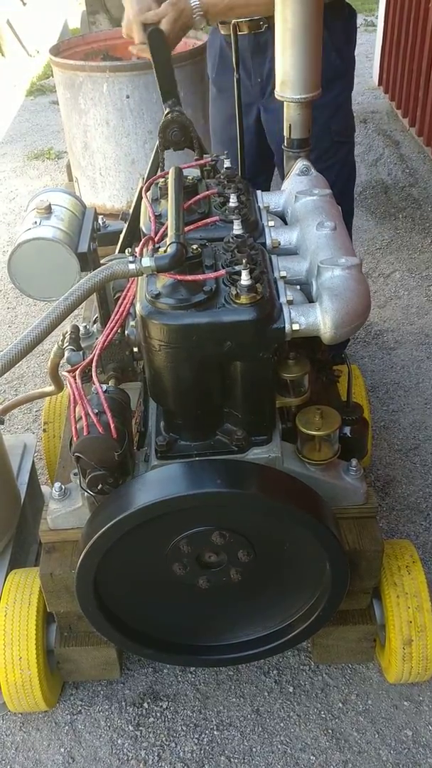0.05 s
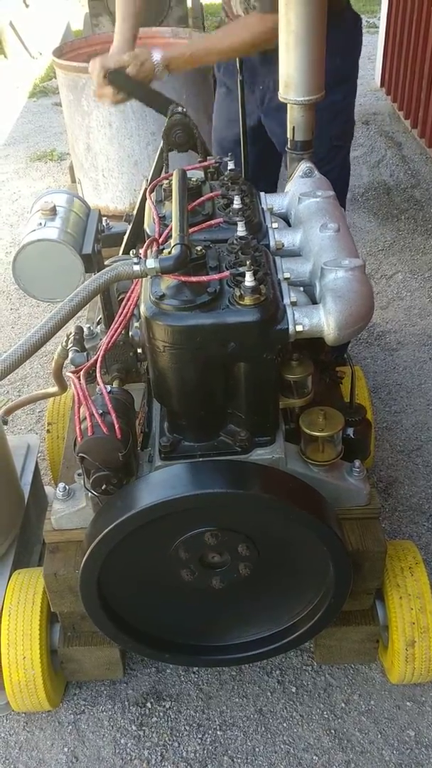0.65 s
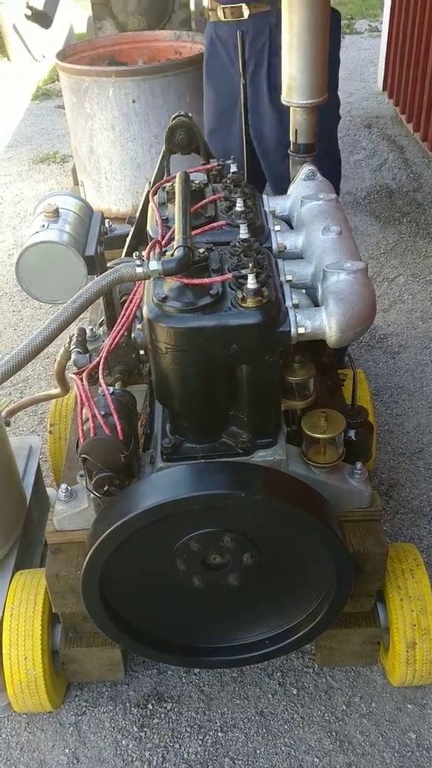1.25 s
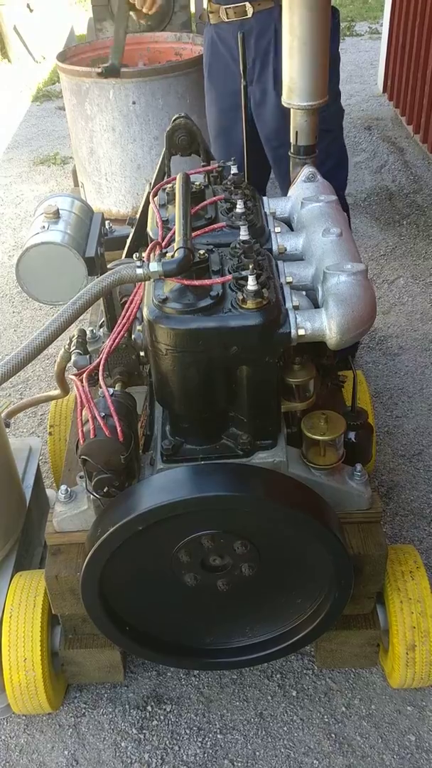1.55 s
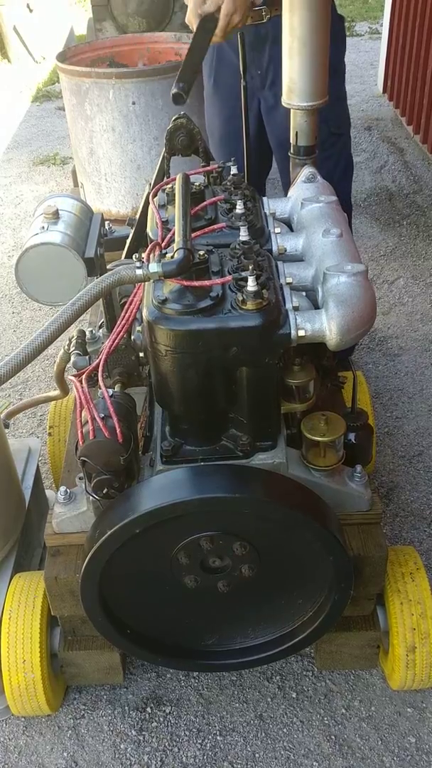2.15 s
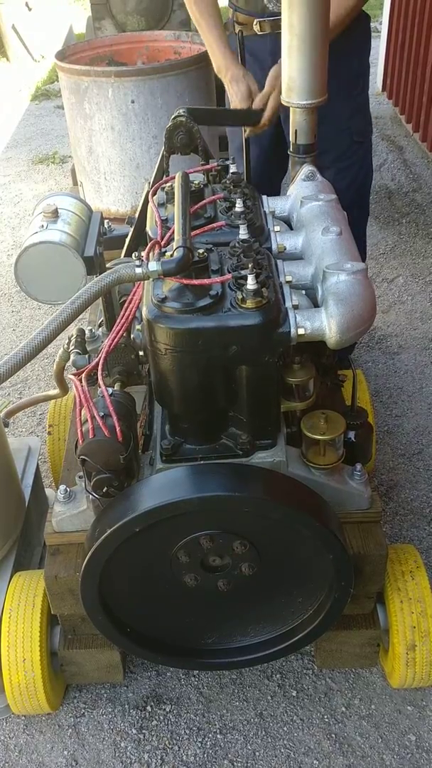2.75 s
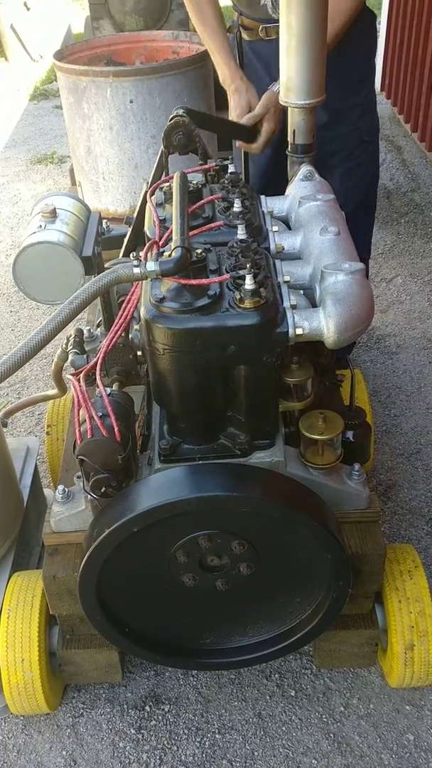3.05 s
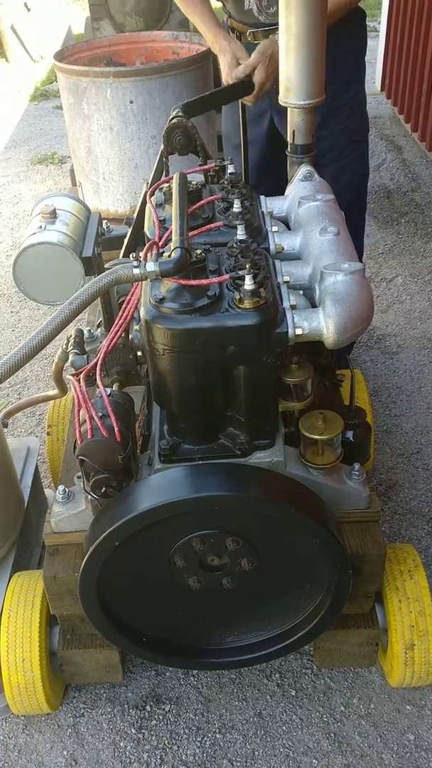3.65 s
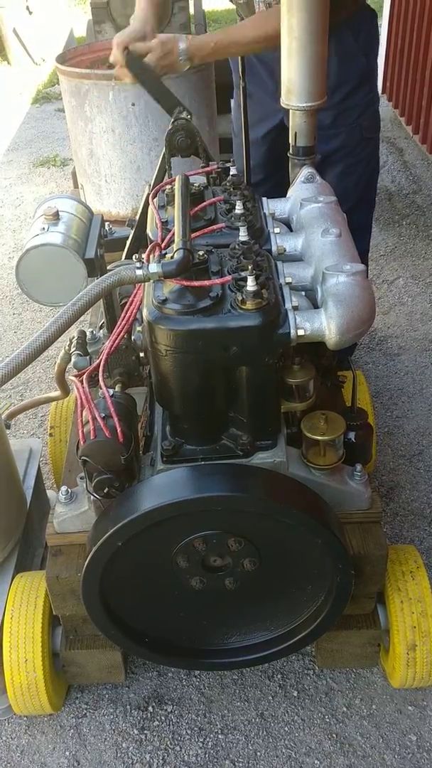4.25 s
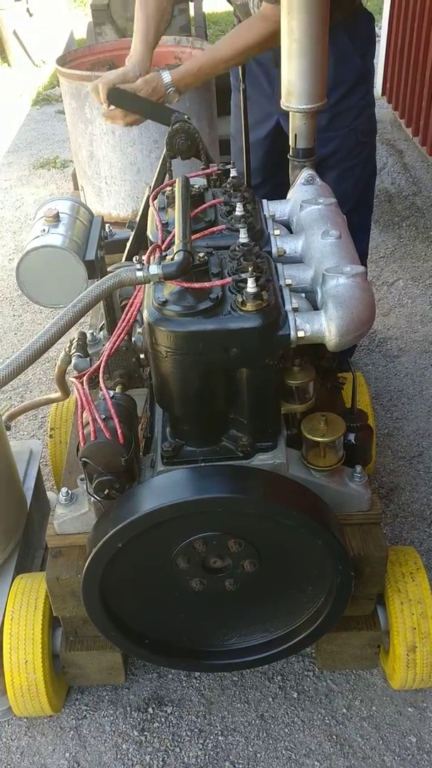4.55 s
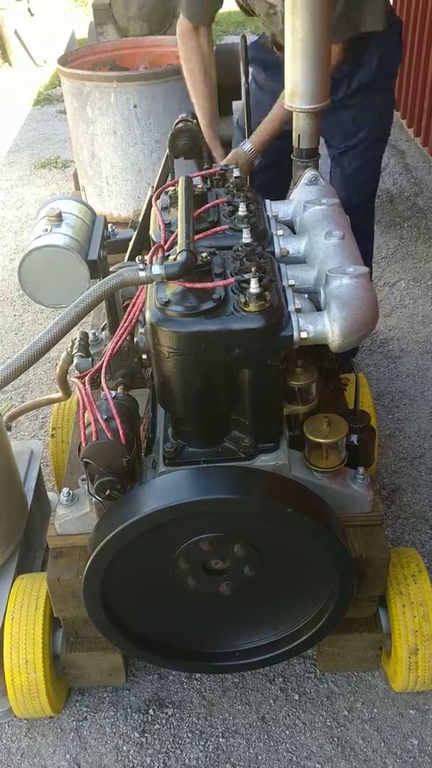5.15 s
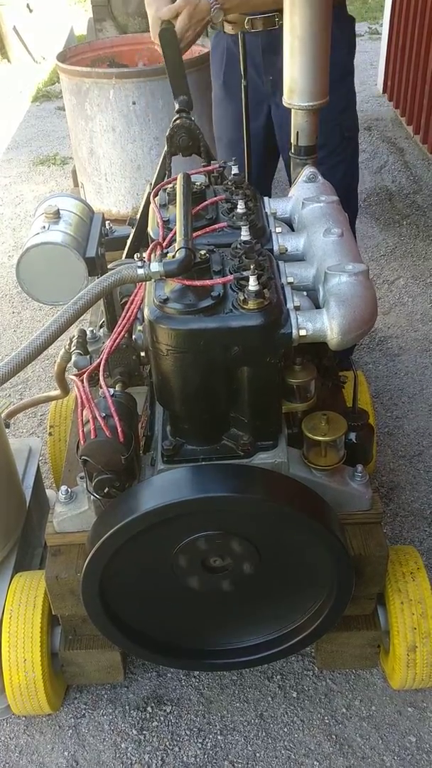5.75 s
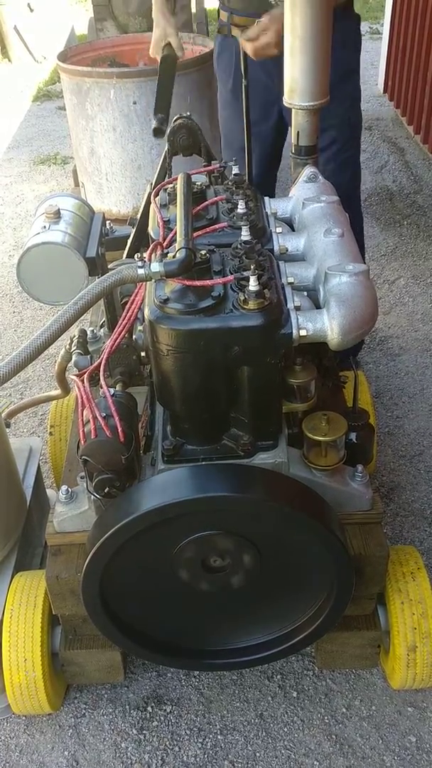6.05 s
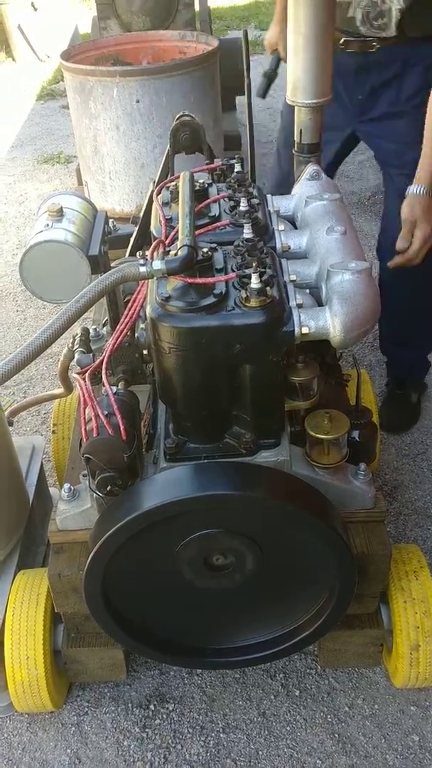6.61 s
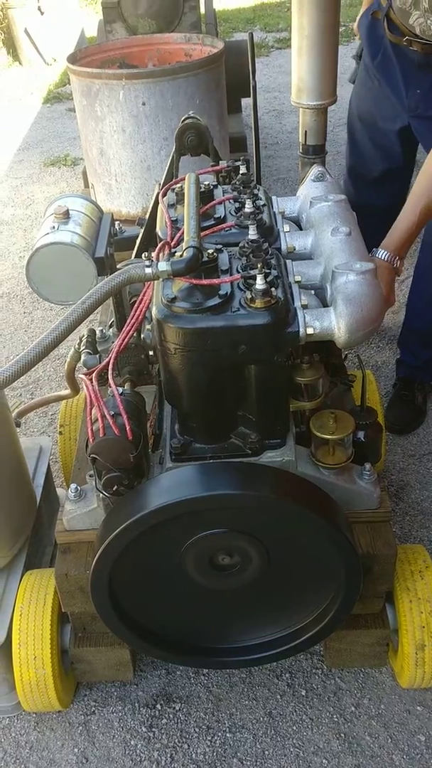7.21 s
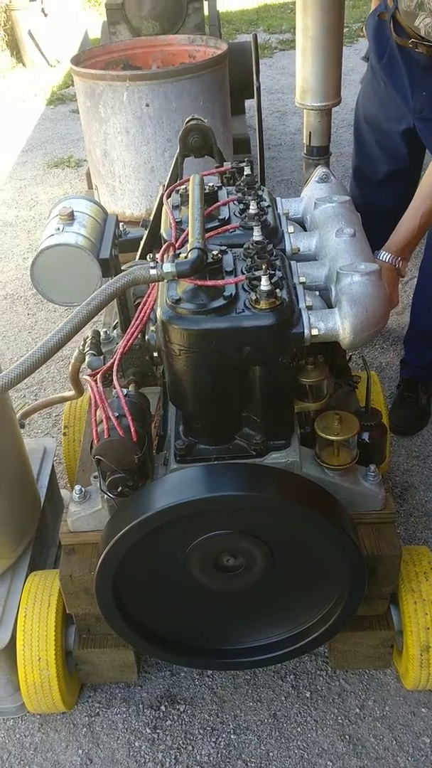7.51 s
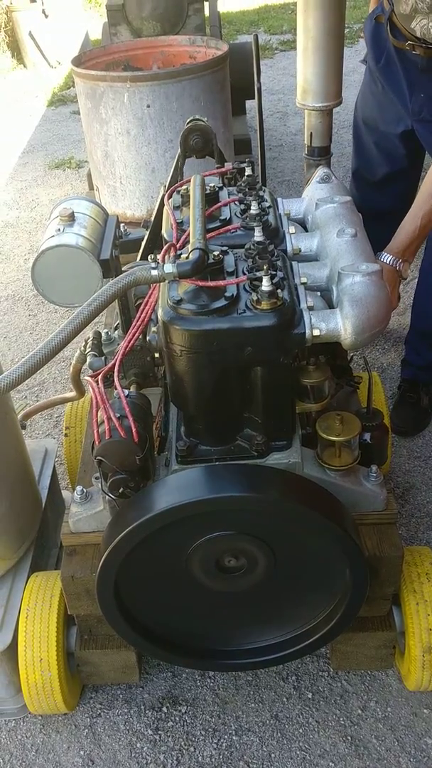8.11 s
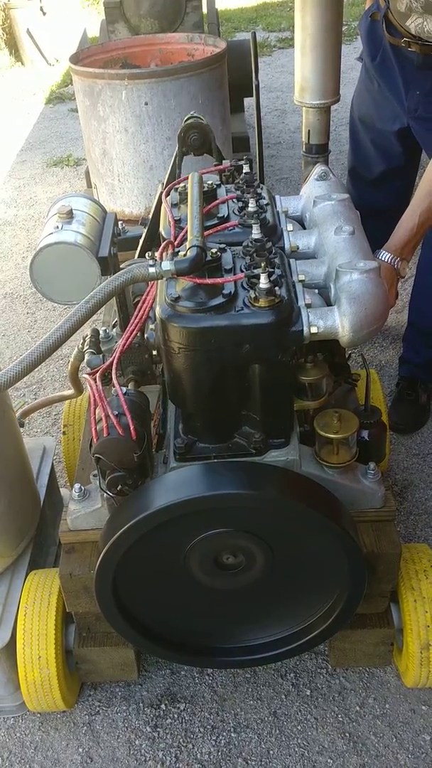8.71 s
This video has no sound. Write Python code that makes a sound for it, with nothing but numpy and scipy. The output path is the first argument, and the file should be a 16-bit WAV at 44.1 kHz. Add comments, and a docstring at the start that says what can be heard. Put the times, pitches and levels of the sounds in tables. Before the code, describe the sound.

Soft outdoor air is heard throughout, with light wind buffeting the microphone mostly in the first two seconds. From about 0.7 to 1.4 seconds, the starting crank of an old four-cylinder engine clacks loudly in its chain drive, with short steel pings and a faint hiss of air, followed by two faint chain scrapes. Scattered clicks and knocks continue from 2.4 to 5.1 seconds, with one sharp, ringing clank near 2.9 and a cluster of softer knocks between 4.1 and 4.5. At about 5.5 seconds, a second swing sets off several separate firings that spit and boom in the silencer. The engine catches around 5.9, sags briefly near 6.4, then gathers speed with an intake roar and a thin, rattling whistle. From about 7.5 seconds the roar eases into a loud, fast idle, clattering, hissing and throbbing until the end, near 9 seconds.

```python
"""An old four-cylinder boat engine is started by hand in an open yard, with wind on the microphone.
The starting crank clacks in its chain drive and is swung twice, drawing in air; loose steel rings on.
On the second swing a few slow firings burst out and boom in the silencer. The engine catches, roars
through its intake while it gathers speed, and settles into a fast, hissing idle. Its clatter, hiss,
roar, whistle and exhaust throb all beat with the firings."""
import sys
import numpy as np
from scipy import signal
from scipy.fft import rfft, irfft, next_fast_len
from scipy.io import wavfile

SR = 44100
rng = np.random.default_rng(int(sys.argv[2]) if len(sys.argv) > 2 else 0)


def int16_out(signal):
    """Quantize to a 16-bit WAV file."""
    q = np.round(np.clip(np.atleast_2d(signal).T, -1, 1) * 32767)
    wavfile.write(sys.argv[1], SR, q.astype(np.int16))


N = 386757
T = np.arange(N) / SR
CATCH_S = 5.87  # the engine runs by itself from here

# The engine sags, picks up and levels off. Each row: time in seconds, firings per second.
SPEED = [(6.0, 19.6), (6.38, 17.2), (6.6, 21.3), (6.75, 24.8), (7.0, 29.7), (7.3, 33.7), (8.03, 36.6),
         (8.44, 34.8), (8.77, 32.7)]
# Resonances of the intake. Each row: pitch in Hz, width in Hz, level in dB.
INTAKE_MODES = [(234, 130, -9), (394, 160, -6), (511.7, 40, -8), (683, 300, -1.5), (725, 68, -8.5),
                (907, 88, -3)]
# Tone of the air hiss. Each row: frequency in Hz, level in dB.
HISS_COLOUR = [(1500, -1.5), (3300, 7.5), (4200, 9.5), (5100, 6), (6200, 10), (8400, -1), (11000, 2.5),
               (13500, -1), (16000, 5.5)]
# Boom of the silencer. Each row: frequency in Hz, level in dB.
SILENCER_COLOUR = [(12, -52), (36, 0.5), (52, 4), (76, 2.5), (105, 2), (145, -8), (300, -26), (900, -55)]


def gain_of(db):
    """Decibels to amplitude."""
    return 10 ** (np.asarray(db) / 20)


def unit_rms(x):
    """Scales to an rms of 1."""
    return x / np.sqrt(np.mean(x ** 2) + 1e-20)


def spectrum_at(points, hz):
    """Reads a spectrum on a log-frequency axis."""
    f, value = np.transpose(points)
    return np.interp(np.log(hz + 1), np.log(f + 1), value)


def automation(points):
    """Draws a line through timed points, at every sample."""
    return np.interp(T, *np.transpose(points))


def add(mix, start_s, sound):
    """Mixes a stereo sound in."""
    part = mix[:, round(start_s * SR):][:, :sound.shape[1]]
    part += sound[:, :part.shape[1]]


def coloured(x, points, size=8192):
    """Minimum-phase EQ, so that nothing sounds ahead of an attack."""
    log_gain = np.log(gain_of(spectrum_at(points, abs(np.fft.fftfreq(size, 1 / SR)))))
    taps = np.fft.ifft(np.exp(np.conj(signal.hilbert(log_gain)))).real[:size // 2]
    return signal.oaconvolve(x, taps[None], axes=1)[:, :x.shape[1]]


def noise(size=N):
    """Stereo white noise: alike in the bass, wide in the treble."""
    # Likeness of the two microphone ports. Each row: frequency in Hz, correlation from 0 to 1.
    likeness = [(110, .88), (300, .72), (700, .42), (2400, 0)]
    full = next_fast_len(size)
    left, unrelated = rfft(rng.standard_normal((2, full)))
    same = spectrum_at(likeness, np.fft.rfftfreq(full, 1 / SR))
    right = same * left + np.sqrt(1 - same ** 2) * unrelated
    return irfft(np.array([left, right]), full)[:, :size]


def waver(per_s, size=N):
    """Random drift of rms 1 that glides to a new value per_s times a second."""
    samples = np.arange(size)
    return unit_rms(np.interp(samples * per_s / SR, samples, rng.standard_normal(size)))


def resonances(x, modes):
    """Rings x through a set of steep resonances; the sum has an rms of 1."""
    out = 0
    for hz, width, db in modes:
        b, a = signal.iirpeak(hz, hz / (0.63 * width), fs=SR)
        out = out + gain_of(db) * unit_rms(signal.lfilter(b, a, signal.lfilter(b, a, x)))
    return unit_rms(out)


def tinny_echoes(x, share, within_s, drift_per_s=7, count=8):
    """Short, randomly wavering echoes give the hiss and knocks a shifting, tinny grain."""
    out, size = x.copy(), x.shape[1]
    for port, source in zip(out, x):
        for delay in (within_s * rng.uniform(.06, 1, count) * SR).astype(int):
            port[delay:] += share / np.sqrt(count) * waver(drift_per_s, size - delay) * source[:-delay]
    return out / np.sqrt(1 + share ** 2)


def yard(wash_db=-47, hum_hz=70, hum_db=-48):
    """A soft outdoor wash with a distant, wavering hum."""
    # Tone of the open air. Each row: frequency in Hz, level in dB.
    yard_colour = [(100, -29), (180, -2), (300, -4.5), (430, -13), (950, -6), (2400, -19), (5200, -26.5),
                   (8500, -37), (15500, -35.5)]
    wash = gain_of(wash_db + .5 * waver(3.06)) * unit_rms(coloured(noise(), yard_colour))
    return wash + gain_of(hum_db) * resonances(noise(), [(hum_hz, 7, 0)])


def wind(breeze_db=-44, fade_db_per_s=1.15, lumps_db=2, flutter_db=-3, right_bias_db=13.5):
    """A fading breeze and buffets rumble on the microphone; the harder they blow, the brighter."""
    # Single buffets. Each row: peak time in seconds, length in seconds, level in dB.
    buffets = [(0.176, 0.026, -33), (0.838, 0.18, -38), (1.165, 0.18, -33.5), (1.453, 0.12, -29.5),
               (1.783, 0.082, -32), (1.979, 0.11, -27.5), (3.087, 0.2, -36), (3.654, 0.23, -39.5),
               (4.615, 0.13, -40.5)]
    breeze = gain_of(breeze_db - fade_db_per_s * T)
    buffet_power = sum(gain_of(db) ** 2 * np.exp(-(2 * (T - s) / span) ** 2) for s, span, db in buffets)
    force = np.sqrt(breeze ** 2 + buffet_power)
    # Tone of the rumble. Each row: frequency in Hz, level in dB.
    wind_colour = [(30, -31), (50, 6), (95, 0.5), (150, -8), (260, -29), (2000, -61.5)]
    rumble = unit_rms(gain_of(lumps_db * waver(30)) * coloured(noise(), wind_colour))
    flutter = unit_rms(coloured(coloured(noise(), wind_colour), [(70, -13.5), (140, -6)]))
    sharpness = gain_of(flutter_db) * 2 * force / force.max()
    pan = gain_of([[-right_bias_db / 2], [right_bias_db / 2]])  # the right port is struck harder
    return pan * force * (rumble + sharpness * flutter) / np.hypot(1, sharpness)


def swing_air(rough_db=2):
    """Air hisses in as the flywheel gathers speed on each swing, and fades as it slows."""
    # Swings of the crank. Each row: fastest moment in seconds, length in seconds, level in dB.
    swings = [(1.13, 0.74, -46), (5.587, 0.43, -39.5)]
    swell = sum(gain_of(db) * np.exp(-(2 * (T - s) / length) ** 2) for s, length, db in swings)
    return swell * unit_rms(coloured(noise() * gain_of(rough_db * waver(60)), HISS_COLOUR))


def chain_scrapes(rise_s=0.0073, t60=0.5, rough_db=3):
    """The slack chain rubs unevenly as it runs on after the first swing, and its ring fades."""
    # Rubs of the chain. Each row: start in seconds, length in seconds, level in dB.
    scrapes = [(1.421, 0.083, -41.5), (1.774, 0.067, -44.5)]
    # Ring of the chain. The row: pitch in Hz, width in Hz, level in dB.
    chain_ring = [(2310, 800, 0)]
    out, t = np.zeros((2, N)), T[:SR]
    for start, length, db in scrapes:
        rub = resonances(noise(len(t)) * gain_of(rough_db * waver(79, len(t))), chain_ring)
        envelope = np.minimum(t / rise_s, 1) * gain_of(db - 60 * np.maximum(t - length, 0) / t60)
        add(out, start, rub * envelope)
    return out


def steel_pings(width_hz=220, rise_s=.002):
    """Loose steel parts ring on after the hardest knocks, each in a narrow, beating band."""
    # Ringing parts. Each row: start in seconds, pitch in Hz, level in dB, t60 in seconds.
    pings = [(1.105, 2690, -20, 0.2), (1.107, 5640, -22.5, 0.24), (1.12, 5100, -29, 0.35),
             (1.198, 4080, -27, 0.17), (2.872, 2650, -9, 0.097), (2.873, 2906, -27, 0.3)]
    out, t = np.zeros((2, N)), T[:SR]
    for start, hz, db, t60 in pings:
        ring = resonances(noise(len(t)), [(hz, width_hz, 0)])
        add(out, start, ring * gain_of(db - 60 * t / t60) * np.minimum(t / rise_s, 1))
    return out


def frame_ring(t, spread_db=2.5, detune=.04):
    """The steel crank and iron frame ring; each blow lands elsewhere and favours other modes."""
    # Modes of crank and frame. Each row: pitch in Hz, level in dB, t60 in seconds.
    modes = [(635, -7, .07), (1380, -9, .05), (1790, -5, .05), (2650, -3, .05), (4220, -9, .05)]
    ring = 0
    for hz, db, t60 in modes:
        envelope = gain_of(db + spread_db * rng.standard_normal() - 60 * t / t60)
        pitch = hz * (1 + detune * rng.uniform(-1, 1))
        ring = ring + envelope * np.sin(2 * np.pi * pitch * t)
    return ring


def blow(row, colour, t60, echo_db, echo_t60, chatter_db, ring_db):
    """A blow cracks, chatters ever more weakly and dies, with ringing steel and a faint yard echo."""
    _, hold_s, db, body_db, bright_db = row
    sag_db_per_s, crack_tilt_db, crack_share = 101, 5.5, .3
    t = T[:SR // 3]
    after = np.maximum(t - hold_s, 0)
    during = t < hold_s + .004
    sag_db = sag_db_per_s * (t - after)
    envelope = gain_of(-sag_db - 60 * after / t60 + chatter_db * waver(515, len(t)))
    drive = tinny_echoes(noise(len(t)) * envelope, share=.9, within_s=.005)
    steel = signal.fftconvolve(drive, frame_ring(t)[None], axes=1)[:, :len(t)]
    echo = gain_of(echo_db - 60 * after / echo_t60) * noise(len(t))
    hit = unit_rms(coloured(drive + echo, colour)) + gain_of(ring_db) * unit_rms(steel)
    # the first contact is bright; the body of the frame answers after crack_share of the blow
    crack, body = (coloured(hit, [(750, body_db - tilt), (1600, -tilt), (3200, 0),
                                  (8000, bright_db + tilt)]) for tilt in (crack_tilt_db, 0))
    crack_s = crack_share * during.sum() / SR
    crossfade = np.exp(-(t / crack_s) ** 2)
    sound = crossfade * crack + (1 - crossfade) * body
    return gain_of(db) * sound / np.sqrt(np.mean(sound[:, during] ** 2))


def crank():
    """The handle, chain and pawl knock as the engine is turned over."""
    # Knocks. Each row: start in seconds, chatter length in seconds, then level, body, brightness in dB.
    clacks = [(0.721, 0.0043, -37.5, 12, -3), (0.968, 0.0094, -33, 7, 11), (1.006, 0.0034, -23, -13, 5),
              (1.026, 0.029, -13, 5.5, 4.5), (1.072, 0.04, -23.5, 0, 0), (1.1, 0.02, -13, 0, -5),
              (1.187, 0.049, -28, 7.5, 6), (1.264, 0.022, -21.5, 12.5, -28),
              (1.385, 0.029, -26.5, 6.5, 1.5), (2.387, 0.011, -37.5, -9, -3), (2.449, 0.0029, -30, -2, -16),
              (2.787, 0.0074, -41, 3, -4), (2.858, 0.0095, -28.5, -3, -7), (2.869, 0.027, -15.5, -6, -1),
              (3.109, 0.037, -28, 9.5, -11.5), (3.165, 0.0065, -34, 10, -20),
              (3.722, 0.012, -23.5, 1.5, -8), (3.942, 0.015, -35.5, 5, -7.5), (4.11, 0.039, -38, 1, -5),
              (4.286, 0.025, -36.5, -5, -5), (4.337, 0.058, -35.5, 8, -5.5), (4.441, 0.022, -34.5, 6.5, -5),
              (4.501, 0.025, -26.5, 14, 1), (5.103, 0.0041, -43, -11, 5), (5.449, .012, -21, -1, 3.5),
              (5.687, 0.0026, -29.5, 14, 23), (5.714, 0.0048, -25, -9, 3)]
    # Tone of a knock. Each row: frequency in Hz, level in dB.
    clack_colour = [(80, -32.5), (220, 2.5), (430, -12.5), (660, 1), (1100, 3), (1700, 9), (2800, 2),
                    (3500, -2.5), (5600, -4.5), (7500, -14), (16000, -18.5)]
    out = np.zeros((2, N))
    for row in clacks:
        knock = blow(row, clack_colour, t60=.07, echo_db=-21, echo_t60=.35, chatter_db=4, ring_db=-6)
        add(out, row[0], knock)
    return out


def first_firings(boom_db=-18, boom_t60=0.66, intake_db=-11, intake_t60=0.34):
    """Single cylinders fire and spit; each booms in the silencer and rings in the intake."""
    # Firings. Each row: start in seconds, blast length in seconds, then level, body, brightness in dB.
    firings = [(5.469, 0.029, -14, 0.5, 1), (5.6, 0.035, -20.5, -2, 3.5), (5.736, 0.025, -13.5, -1, 2.5),
               (5.837, 0.05, -17, -1.5, 6.5), (5.93, 0.029, -14, -2, -0.5), (5.99, 0.033, -18.5, -6, 7.5),
               (6.153, 0.023, -19, -10, 18)]
    # Tone of a blast. Each row: frequency in Hz, level in dB.
    blast_colour = [(150, 0), (430, -1), (750, 5.5), (2600, 4.5), (3500, -2), (5200, -3), (8200, -16.5),
                    (11000, -14.5), (16000, -16)]
    out, t = np.zeros((2, N)), T[:SR // 2]
    for row in firings:
        start, _, db, _, _ = row
        blast = blow(row, blast_colour, t60=.095, echo_db=-13.5, echo_t60=.88, chatter_db=1, ring_db=-20)
        boom = unit_rms(coloured(noise(len(t)), SILENCER_COLOUR))
        ring = resonances(noise(len(t)), INTAKE_MODES[-2:])
        add(out, start, blast)
        add(out, start, gain_of(db + boom_db - 60 * t / boom_t60) * boom)
        add(out, start, gain_of(db + intake_db - 60 * t / intake_t60) * ring)
    return out


def fader(full_db, per_effort=0, per_draw=0, db_per_doubling=0):
    """Gain of one engine layer: full_db, shifted as effort, draw and speed fall below their peaks."""
    # Firing strength, which falters once early on. Each row: time in seconds, level in dB.
    effort_points = [(6.0, -2), (6.37, -5.5), (6.58, 0.5), (6.75, -2.5), (7.6, 0), (8.77, -2.5)]
    # Air through the throttle, open at first, then eased back. Each row: time in seconds, level in dB.
    draw_points = [(6.0, -6.5), (6.3, -3.5), (6.43, -6.5), (6.78, -0.5), (7.05, -1.5), (7.55, -7.5),
                   (8.77, -14)]
    effort, draw, speed = automation(effort_points), automation(draw_points), automation(SPEED)
    load_db = per_effort * (effort - effort.max()) + per_draw * (draw - draw.max())
    return gain_of(full_db + load_db + db_per_doubling * np.log2(speed / speed.max()))


def throb(strokes, depth_db, peak_at):
    """A swell once per firing, highest at the share peak_at of the stroke."""
    return gain_of(depth_db * np.cos(2 * np.pi * (strokes - peak_at)))


def valve_clatter(speed, ticks_per_firing=14, tick_s=.003, tick_db=-3):
    """Envelope of valve gear and chain: short ticks over a steady churn, thicker with speed."""
    onsets = rng.random(N) < ticks_per_firing * speed / SR
    ticks = unit_rms(signal.lfilter([1], [1, -np.exp(-1 / (tick_s * SR))], onsets.astype(float)))
    clatter = np.hypot(1, gain_of(tick_db) * ticks) * (T >= CATCH_S)
    return clatter / np.sqrt(np.mean(clatter[T >= CATCH_S] ** 2))


def machinery(strokes, slowness, clatter):
    """The moving parts churn in a broad, ticking noise."""
    # Tone of the machinery. Each row: frequency in Hz, level in dB.
    machine_colour = [(60, -5.5), (150, -1), (250, -2.5), (450, -6.5), (800, 0.5), (2100, 3.5),
                      (2800, -0.5), (3400, -6), (6300, -15.5), (8200, -19), (16000, -69)]
    churn = clatter * unit_rms(coloured(noise(), machine_colour))
    level = fader(-17, per_effort=0.1, per_draw=0.08, db_per_doubling=-0.5)
    return level * throb(strokes, 0.56 * slowness, peak_at=0.065) * churn


def engine_hiss(strokes, slowness, clatter):
    """A bright hiss with a shifting, tinny grain pulses with the firings and the clatter."""
    hiss = unit_rms(coloured(tinny_echoes(noise(), share=.7, within_s=.011), HISS_COLOUR))
    level = fader(-17.5, per_effort=1, db_per_doubling=-0.5)
    return level * throb(strokes, 0.67 * slowness, peak_at=0.1) * clatter * hiss


def intake_roar(strokes, slowness):
    """Air drawn in between the firings roars in the resonances of the intake."""
    level = fader(-17, per_draw=1, db_per_doubling=-1.5)
    return level * throb(strokes, slowness, peak_at=0.68) * resonances(noise(), INTAKE_MODES)


def throttle_whistle(strokes, slowness, rattle_db=2):
    """Air whistles and rattles through the narrow throttle gap."""
    # Resonances of the gap. Each row: pitch in Hz, width in Hz, level in dB.
    gap_modes = [(2470, 110, 0), (4700, 430, -5), (6640, 420, -12)]
    rattle = unit_rms(gain_of(rattle_db * waver(150)))
    level = fader(-23, per_effort=-0.5, per_draw=1, db_per_doubling=-4)
    return level * throb(strokes, 1.7 * slowness, peak_at=0.39) * rattle * resonances(noise(), gap_modes)


def exhaust(strokes, slowness, opens_at=0.17, wobble=0.017, turbulence_db=-12, uneven_db=1.7):
    """One pressure pulse per firing booms in the silencer; slow running blurs it with turbulence."""
    openings = np.floor(strokes - opens_at + wobble * waver(30))
    pulses = -np.diff(openings, prepend=openings[0]) * gain_of(uneven_db * rng.standard_normal(N))
    sounding = T >= SPEED[0][0]
    boom = unit_rms(coloured(pulses[None], SILENCER_COLOUR) * sounding)
    boom *= np.sqrt(np.mean(sounding))  # rms 1 while it sounds
    turbulence = unit_rms(coloured(noise(), SILENCER_COLOUR))
    blur = gain_of(turbulence_db) * slowness ** 2
    level = fader(-22.3, per_effort=0.8, db_per_doubling=1)
    return level * (boom + blur * turbulence) / np.hypot(1, blur)


def engine(swell_s=0.22):
    """The engine catches and swells in, all its layers locked to the firings."""
    speed = automation(SPEED)
    strokes = np.cumsum(speed * (T >= CATCH_S)) / SR  # counts one per firing
    slowness = speed.max() / speed  # slow strokes stand further apart, so they throb more deeply
    clatter = valve_clatter(speed)
    out = machinery(strokes, slowness, clatter) + engine_hiss(strokes, slowness, clatter)
    out += intake_roar(strokes, slowness) + throttle_whistle(strokes, slowness)
    out += exhaust(strokes, slowness)
    return np.clip((T - CATCH_S) / swell_s, 0, 1) * out


def scene():
    """All sources together; the right port hears less of the top treble."""
    # Balance of the microphone ports. Each row: frequency in Hz, left over right in dB.
    port_balance = [(100, 3), (450, -2), (740, 3), (1200, 3), (3300, 2.5), (7200, 0.5), (9200, 15),
                    (12500, 17.5), (15500, 7)]
    cranking = crank() + steel_pings() + chain_scrapes() + swing_air()
    mix = cranking + first_firings() + engine() + yard() + wind()
    size = 2 * next_fast_len(N)
    balance_db = spectrum_at(port_balance, np.fft.rfftfreq(size, 1 / SR))
    return irfft(rfft(mix, size) * gain_of([balance_db / 2, -balance_db / 2]), size)[:, :N]


def record(dry):
    """A soft clip rounds off the highest peaks, and a steep low-pass trims the top."""
    ceiling, edge_hz = .9, 15850
    rounded = dry / (1 + (dry / ceiling) ** 6) ** (1 / 6)
    low_pass = signal.firwin(511, edge_hz, window=("kaiser", 9), fs=SR)
    return signal.oaconvolve(rounded, low_pass[None], "same")


dry = scene()
out = record(dry)
int16_out(out)
```